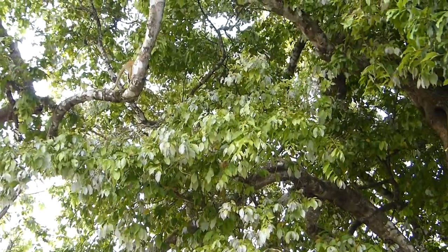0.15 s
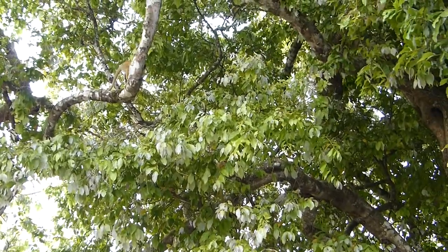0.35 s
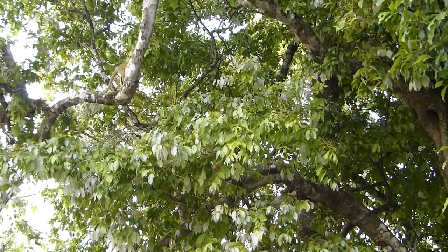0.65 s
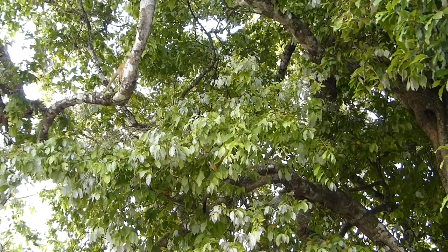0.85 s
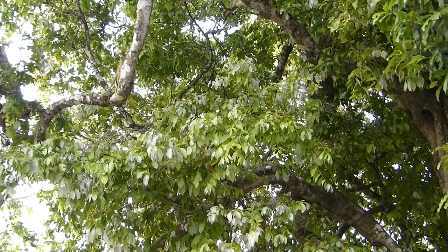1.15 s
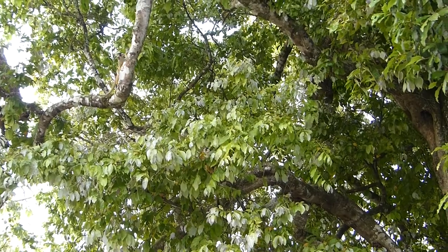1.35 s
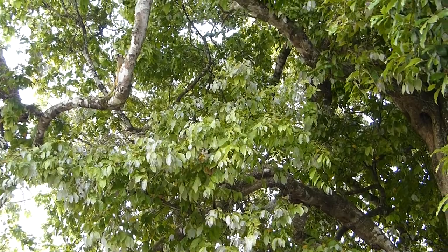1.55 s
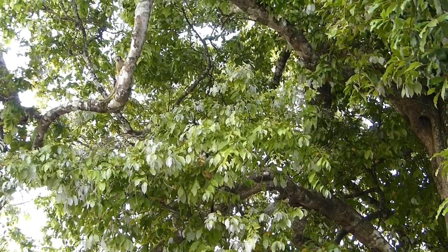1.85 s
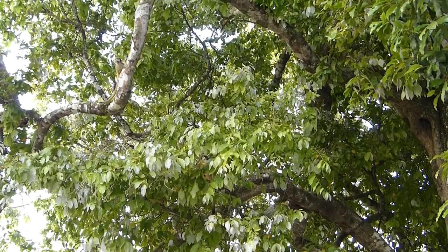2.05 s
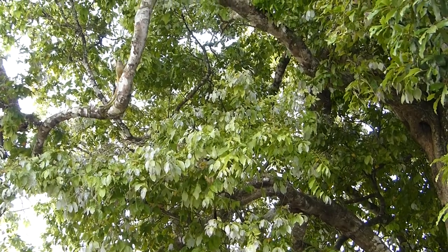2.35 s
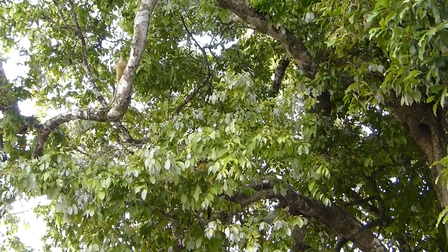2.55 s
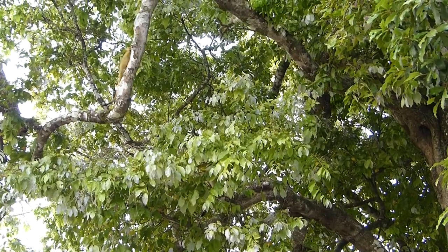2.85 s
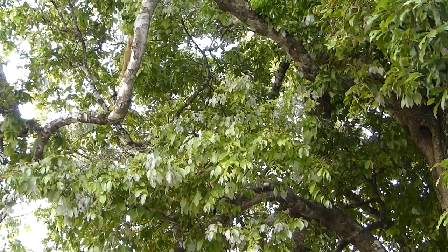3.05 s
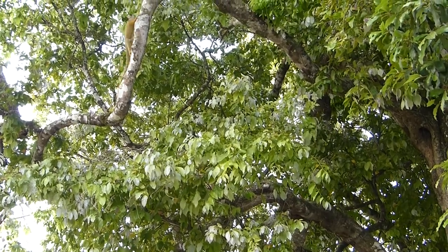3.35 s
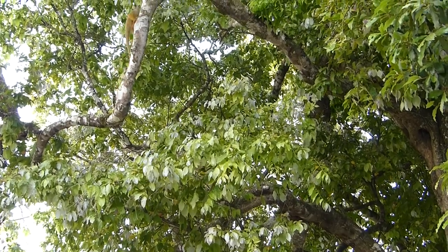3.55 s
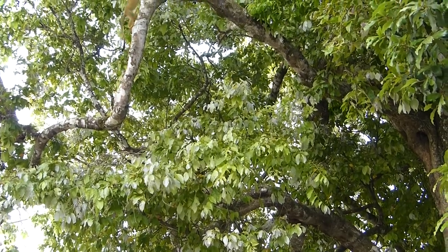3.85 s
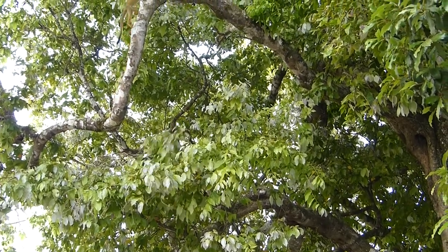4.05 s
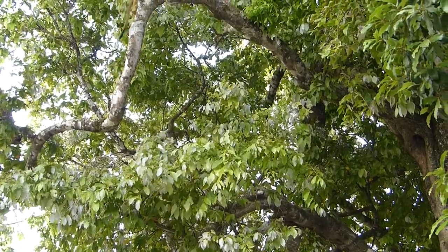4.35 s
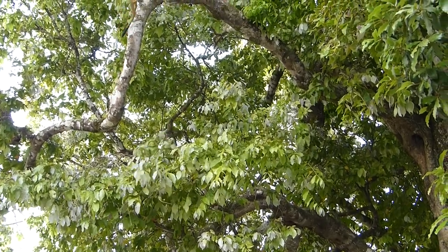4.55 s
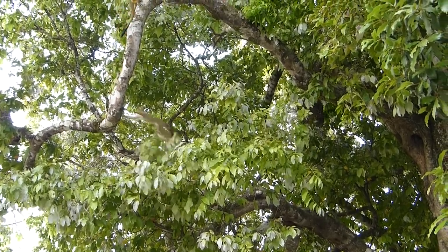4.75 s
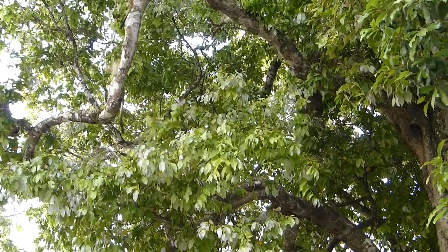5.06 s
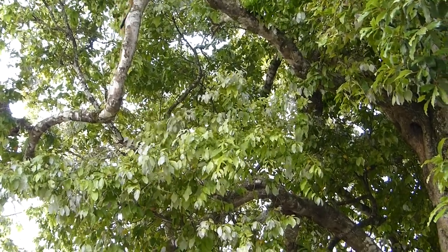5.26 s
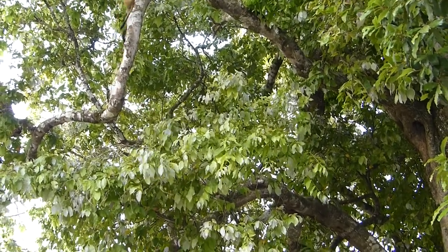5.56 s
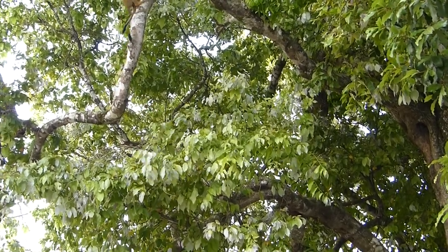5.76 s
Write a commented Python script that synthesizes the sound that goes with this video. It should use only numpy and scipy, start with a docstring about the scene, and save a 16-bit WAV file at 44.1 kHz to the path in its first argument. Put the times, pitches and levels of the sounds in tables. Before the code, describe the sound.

Outdoors under a big leafy tree, a soft insect whine and hissing chorus open the scene. Squirrel monkeys then give short, very high peeps that flick upward, spaced apart at first. After four seconds come longer arched calls, a quick cluster of steep chirps and hoarse notes, and a leafy burst with a dull bough thump. Stereo microphone at some distance, calls leaving short tails in the canopy.

```python
"""An insect whines over a hissing chorus and quiet outdoor air while leaves rustle faintly; then squirrel monkeys
call from a big tree. Thin gliding whistles flick upward at the end, and arched calls, steep chirps and hoarse notes
follow; limbs and leaves scatter each call into a short tail. Foliage is shaped noise that rises and dies with each
shake, a leaping animal's landings are bursts of low noise, and far callers and insects are narrow bands of noise."""
import sys
import numpy as np
from scipy import signal
from scipy.fft import rfft, irfft, next_fast_len
from scipy.io import wavfile

SR = 44100
rng = np.random.default_rng(int(sys.argv[2]) if len(sys.argv) > 2 else 0)


def dump(signal):
    """Clip the signal to [-1, 1] and save it as 16-bit WAV at the path in sys.argv[1]."""
    limited = np.clip(np.atleast_2d(signal).T, -1, 1)
    pcm = np.round(limited * 32767).astype(np.int16)
    wavfile.write(sys.argv[1], SR, pcm)


N = 259749  # samples
CUTOFF_HZ = 15900

SLIDE_SHARE = 0.32  # part of a peep's rise outside the final flick
FLICK_HZ_PER_S = 390000  # over the rise in Hz, this is the flick's growth rate: a wider rise takes longer
# Peeps and chirps, levels before the voice trim:
# start_s, length_s, start_hz, top_hz, level_db, crescendo_db, direct_path_db
PEEPS = [ (.52, 0.054, 7860, 10780, -35.5, 9.5, 2), (.906, .023, 7690, 10220, -31.5, -5.5, -1.5),
         (1.236, 0.06, 8360, 11500, -27.5, 9.5, 5), (1.494, 0.074, 8320, 11360, -27.5, 3, 4.5),
         (1.75, 0.076, 8210, 11320, -26, 3, 3.5), (2.557, 0.054, 8540, 11000, -27, 8, 4.5),
         (2.81, 0.06, 8070, 10700, -28.5, 2, 3), (3.296, 0.068, 8660, 10770, -27, -3.5, -10),
         (3.537, 0.088, 8265, 10620, -27, 2, 3), (4.129, 0.012, 8830, 11670, -21, 8, 1),
         (4.595, .048, 7030, 13000, -24, 4.5, -0.5), (4.8, .044, 6980, 13600, -22, 3.5, 2.5),
         (4.967, 0.074, 6560, 12760, -20, -4.5, -5.5), (5.174, 0.077, 5540, 13300, -24, 16, 6),
         (5.384, 0.075, 5144, 12080, -25, 7, 2.5), (5.43, 0.11, 8770, 11880, -27.5, 12.5, -16)]


def peeps(swell_db=3.5, pan_db=0.37, bright_db=6.5):
    """The pitch slides up, then shoots up just before the call stops; leaves in the way weaken the direct path."""
    out = np.zeros((2, N))
    for start, length, start_hz, top_hz, call_db, crescendo_db, direct_db in PEEPS:
        t = np.arange(int(length * SR)) / SR
        rise_hz = top_hz - start_hz
        progress = t / length
        flick = np.exp((t - length) * FLICK_HZ_PER_S / rise_hz)
        pitch_hz = start_hz + rise_hz * progress * (SLIDE_SHARE + (1 - SLIDE_SHARE) * flick)
        # the voice swells where the flick sets in
        swell = np.sin(np.pi * flick) - 0.5
        level_db = call_db + crescendo_db * (progress - 0.5) + swell_db * swell
        call = whistle(pitch_hz, level_db, overtone_at(call_db) + bright_db)
        add(out, start, canopy(call, direct_db))
    return out * from_db([[pan_db], [-pan_db]])


# Plain upward glides, most of them leading into a peep, levels before the voice trim:
# start_s, length_s, start_hz, end_hz, level_db, direct_path_db
GLIDES = [ (1.202, .03, 6300, 7960, -50.5, -19), (1.702, 0.0288, 4400, 5240, -47.5, 0.5),
          (2.531, .035, 5600, 7030, -49, -6), (3.287, .026, 5800, 6970, -47, -5),
          (3.509, 0.036, 6010, 8390, -27.5, -1.5), (3.835, 0.021, 7500, 8740, -40, 0.5),
          (3.999, 0.11, 8460, 9420, -27.5, 2)]


def glides(effort_db=6.0, bright_db=4.0, ease=0.731, soft_db=-7.5, swell_s=0.0045):
    """The pitch rises and eases off; the voice swells out of a soft start."""
    out = np.zeros((2, N))
    for start, length, start_hz, end_hz, call_db, direct_db in GLIDES:
        t = np.arange(int(length * SR)) / SR
        progress = t / length
        pitch_hz = start_hz + (end_hz - start_hz) * progress * (1 + ease * (1 - progress))
        level_db = call_db + soft_db * np.exp(-t / swell_s)
        call = whistle(pitch_hz, level_db, overtone_at(call_db + effort_db) + bright_db)
        add(out, start, canopy(call, direct_db))
    return out


ARCH_RISE_S, ARCH_FLICK_S = 0.028, 0.028  # climb to the crest (time constant), closing flick
ARCH_SWELL_S = 0.01  # time constant of the swell out of a soft start
ARCH_PUSH_AFTER_S, ARCH_PUSH_S = 0.014, 0.005  # the push comes this long into the fall, and takes this long
ARCH_FLICK_DB = -4  # the voice thins out in the flick
# Arched calls, levels before the voice trim:
# start_s, length_s, crest_s, fall_s, start_hz, crest_hz, dip_hz, top_hz,
# level_db, soft_start_db, push_in_fall_db, overtone_db (before the throat)
ARCHES = [ (4.249, 0.26, .1, 0.12, 7870, 9340, 5968, 8970, -23.5, -7, 2.5, -4),
          (4.66, 0.098, 0, .039, 4975, 4970, 4515, 8970, -27, 0.5, 3, -1),
          (5.656, .22, .13, .063, 8080, 9430, 7010, 10300, -22, -19.5, 4, 5)]


def arches(roughness=0.0042, direct_db=-1.5, flick_bend=1.0):
    """Calls move to a crest, swing down through a dip while growing louder, and end in an upward flick."""
    out = np.zeros((2, N))
    for (start, length, crest_s, fall_s, start_hz, crest_hz, dip_hz, top_hz,
         call_db, soft_db, push_db, overtone_db) in ARCHES:
        t = np.arange(int(length * SR)) / SR
        falling_s = np.maximum(t - crest_s, 0)
        push = np.clip((falling_s - ARCH_PUSH_AFTER_S) / ARCH_PUSH_S, 0, 1)
        flick = np.maximum(1 - (length - t) / ARCH_FLICK_S, 0) ** flick_bend
        pitch_hz = crest_hz + (start_hz - crest_hz) * np.exp(-t / ARCH_RISE_S)
        pitch_hz += (dip_hz - crest_hz) * np.sin(np.pi / 2 * falling_s / fall_s) ** 2
        pitch_hz += (top_hz - pitch_hz) * flick
        level_db = call_db + soft_db * np.exp(-t / ARCH_SWELL_S) + push_db * push + ARCH_FLICK_DB * flick
        call = whistle(pitch_hz, level_db, overtone_db, waver=roughness)
        add(out, start, canopy(call, direct_db))
    return out


# Low, hoarse notes among the chirps, levels before the voice trim:
# start_s, length_s, pitch_hz, level_db, overtone_db (before the throat), roughness (share of the pitch)
RASPS = [(4.956, 0.029, 2455, -40, 8.5, 0.023), (5.004, 0.043, 4837, -20.5, -9, 0.059),
         (5.212, 0.0335, 5130, -27.5, 0, 0.026)]


def rasps(direct_db=-5.0):
    """Hoarse notes hold one unsteady pitch."""
    out = np.zeros((2, N))
    for start, length, hz, level_db, overtone_db, roughness in RASPS:
        pitch_hz = np.full(int(length * SR), hz)
        call = whistle(pitch_hz, level_db, overtone_db, waver=roughness)
        add(out, start, canopy(call, direct_db))
    return out


ATTACK_S = 0.004
# How a small throat and mouth pass the whistle: frequency_hz, gain_db
THROAT = [(2300, 0), (4500, 1), (9000, 0.5), (10500, -5), (12000, -13), (13500, -21.5), (15500, -42)]


def whistle(pitch_hz, level_db, overtone_db, release_s=0.0017, waver=0.0021, third_db=-13):
    """A slightly unsteady tone with two overtones, shaped by the throat."""
    size = len(pitch_hz)
    t = np.arange(size) / SR
    pitch_hz = pitch_hz * (1 + waver * drift(717, size))
    phase = 2 * np.pi * np.cumsum(pitch_hz) / SR
    tone = np.zeros(size)
    for k, partial_db in enumerate((0, overtone_db, overtone_db + third_db), 1):
        # partials fade out over 1 kHz above the cutoff
        audible = np.clip((CUTOFF_HZ + 1000 - k * pitch_hz) / 1000, 0, 1)
        throat_db = at_hz(THROAT, k * pitch_hz)
        tone += audible * from_db(partial_db + throat_db) * np.sin(k * phase)
    gate = np.clip(np.minimum(t / ATTACK_S, (t[-1] - t) / release_s), 0, 1)
    return np.sqrt(2) * tone * from_db(level_db) * np.sin(np.pi / 2 * gate) ** 2


def overtone_at(level_db, full_voice_db=-25, fade_db_per_db=7):
    """The harder a monkey calls, the stronger its overtones, up to full voice."""
    return fade_db_per_db * min(level_db - full_voice_db, 0)


def canopy(call, direct_db, near_db=-2.5, near_t60=0.27, far_db=-4.0, far_t60=0.45, near_alike=0.75,
           far_alike=0.69, build_s=0.0062, limb_s=0.033, limb_echo_db=-15):
    """The direct call, echoes off limbs, a quick spray off nearby leaves, and a wider tail from the whole crown."""
    t = np.arange(SR * 3 // 4) / SR
    response = np.zeros((2, len(t)))
    for level_db, t60, alike in ((near_db, near_t60, near_alike), (far_db, far_t60, far_alike)):
        fade = 10 ** (-3 * t / t60)  # 60 dB down after t60 seconds
        density = fade * (1 - np.exp(-(t / build_s) ** 2))
        response += from_db(level_db) * stereo_noise(alike, len(t)) * density / np.linalg.norm(density)
    # late copies of a gliding tone beat against it and make it flutter
    delays_s = 2 * build_s + limb_s * rng.random(size=3)
    response[:, (delays_s * SR).astype(int)] += from_db(limb_echo_db)
    response[:, 0] += from_db(direct_db)
    return signal.fftconvolve(call[None], response, axes=1)


# Stirring of the leaves as the troop moves: faint, then growing, with a brief surge near 5 s before it fades.
# Levels before the stir and leaf trims: time_s, level_db
STIR = [(0.0, -69), (0.69, -71), (3.64, -62), (4.86, -59), (4.99, -48.5), (5.15, -61), (5.68, -65.5),
        (5.89, -69.5)]
# A branch is brushed or shaken, before the leaf and twig trims: start_s, leaf_db, twig_db, decay_s
RUSTLES = [ (.09, -65, -65, .05), (.31, -68, -56, 0.15), (1.28, -64, -56, .08), (1.6, -65, -52.5, 0.09),
           (1.92, -60, -55.5, 0.092), (2.44, -64.5, -53, 0.17), (2.89, -55, -46.5, 0.042),
           (3.42, -63.5, -55, 0.14), (3.75, -70, -50, 0.035), (3.99, -68, -53, 0.15),
           (4.24, -58.5, -53.5, 0.3), (4.785, -50.5, -48, 0.13), (4.86, -46.5, -49.5, 0.097),
           (4.976, -36.5, -54, 0.074), (5.031, -52.5, -39.5, 0.093), (5.32, -64, -50.5, 0.15)]
# Colour of brushed leaves: frequency_hz, relative_level_db (per Hz)
LEAVES = [(300, -23), (1000, -11.5), (1800, -2.5), (3000, 5.5), (5000, 8), (9000, 7.5), (13000, -12.5),
          (16000, -58)]
# Dull colour of swaying twigs and of the outdoor air: frequency_hz, relative_level_db (per Hz)
AIR = [(15, -55), (25, -24), (69, -16.5), (234, -5.5), (409, -3.5), (468, 3), (525, -2.5), (649, 3),
       (743, 4.5), (802, -2), (1090, -6.5), (1200, -5), (1460, -7.5), (2500, -16), (3250, -24.5),
       (5500, -120)]


def foliage(leaf_db=7.0, twig_db=1.5, crackle_db=1.0, snaps_per_s=450, snap_db=-10.5, stir_db=-2, sway_db=-60):
    """Leaves brush in small uneven bursts and tick against each other, over the duller sway of twigs."""
    leaf_power = from_db(in_time(STIR)[0] + stir_db) ** 2
    twig_power = from_db(sway_db) ** 2  # twigs sway all the time
    for start, leaves_db, twigs_db, decay_s in RUSTLES:
        motion = shake(start, 0.012, decay_s)
        leaf_power = leaf_power + (from_db(leaves_db) * motion) ** 2
        twig_power = twig_power + (from_db(twigs_db) * motion) ** 2
    brushing = rms_one(broad(LEAVES) * from_db(crackle_db * drift(300, N)))
    snaps = (rng.random(N) < snaps_per_s / SR) * rng.standard_normal(N)
    tick_band = signal.butter(2, [1200, 5000], "band", fs=SR, output="sos")
    ticking = rms_one(signal.sosfilt(tick_band, snaps + 1e-18))
    leaves = (brushing + from_db(snap_db) * ticking) * from_db(leaf_db) * np.sqrt(leaf_power)
    twigs = broad(AIR) * from_db(twig_db) * np.sqrt(twig_power)
    return leaves + twigs


# An animal's weight on a limb: start_s, level_db, decay_s
LANDINGS = [(4.785, -52, 0.05), (5.027, -30, 0.061), (5.32, -60, 0.11)]
# Colour of a thrashing bough: frequency_hz, relative_level_db (per Hz)
BOUGH = [(53, -52), (90, -52), (274, -23), (431, -9.5), (544, -12), (707, -3.5), (868, -17.5),
         (1370, -12.5), (2400, -53), (3120, -49), (5280, -120)]


def landings(give_s=0.014):
    """A bough gives under a leaping animal and thrashes to rest."""
    swing = sum(from_db(level_db) * shake(start, give_s, decay_s) for start, level_db, decay_s in LANDINGS)
    return swing * broad(BOUGH)


def shake(start, attack_s, decay_s):
    """Motion of a disturbed branch: it builds quickly and dies away."""
    t = np.maximum(np.arange(N) / SR - start, 0)
    return (1 - np.exp(-t / attack_s)) * np.exp(-t / decay_s)


# Far-off callers, blurred by distance: start_s, length_s, pitch_hz, blur_hz, level_db
FAR_CALLS = [(3.75, 0.17, 1260, 170, -57), (4.194, 0.19, 1280, 170, -53.5), (4.38, 0.084, 1265, 164, -49),
             (4.678, 0.31, 1284, 169.2, -49), (5.118, 0.23, 1744, 75, -58.5), (5.437, 0.26, 1760, 76, -59),
             (5.663, .3, 1786, 75, -60.5)]


def far_calls():
    """Faint notes from far away, smeared into narrow bands, swell and fade."""
    out = np.zeros((2, N))
    for start, length, hz, blur_hz, level_db in FAR_CALLS:
        progress = np.clip((np.arange(N) / SR - start) / length, 0, 1)
        out += from_db(level_db) * np.sin(np.pi * progress) * narrow(hz, blur_hz)
    return out


# Bouts of the nearest insect: start_s, end_s, rise_s, fall_s, level_db
INSECT_BOUTS = [(0, 1.03, .3, .12, -58.5), (0.992, 2.35, 0.115, .5, -59), (3.904, 6.2, 0.37, .3, -59)]


def near_insect(width=190, sung_hz=5277, wind_up_hz_per_s=620, idle_db=-68.5):
    """One insect idles between bouts; each bout winds up in pitch and level, holds and fades."""
    t = np.arange(N) / SR
    gain, hz = from_db(idle_db), sung_hz
    for start, end, rise_s, fall_s, level_db in INSECT_BOUTS:
        bout = np.clip(np.minimum((t - start) / rise_s, (end - t) / fall_s), 0, 1)
        gain = np.maximum(gain, from_db(level_db) * bout)
        hz = hz - wind_up_hz_per_s * np.maximum(start + rise_s - t, 0) * (t >= start)
    return gain * blurred_tone(hz, width)


# Bands of the insect chorus, before its swell: centre_hz, width_hz, level_db
INSECT_BANDS = [(4960, 390, -58), (6070, 500, -56), (8340, 2000, -57.5)]
# Swell of the chorus: time_s, gain_db
CHORUS_SWELL = [(0, -6), (.35, -7.5), (1.9, -10), (2.3, -9), (3.9, -14), (4.3, -4.5), (5.89, -5.5)]


def insects():
    """One insect sings over a distant chorus that hisses in a few narrow bands."""
    swell_db, = in_time(CHORUS_SWELL)
    chorus = sum(from_db(level_db) * narrow(hz, width) for hz, width, level_db in INSECT_BANDS)
    return from_db(swell_db) * chorus + near_insect()


def outdoor_air(level_db=-56):
    """The quiet outdoor floor, a steady diffuse noise."""
    return from_db(level_db) * broad(AIR)


# Colour of the microphone hiss: frequency_hz, relative_level_db (per Hz)
HISS = [(20, 7.5), (60, -4), (300, -15), (14000, -8), (15500, -14)]


def microphone_hiss(level_db=-74):
    """Steady noise of the microphone."""
    return from_db(level_db) * broad(HISS)


# Left-right likeness of the surroundings: frequency_hz, correlation (-1 to 1)
LIKENESS = [(30, 1), (80, 0.8), (170, -0.063), (350, -0.53), (700, -0.64), (1050, 0.16), (1400, 0.15),
            (2100, 0.39), (3500, 0.66), (12000, 0.69)]


def surround(colour_db):
    """Diffuse stereo noise of rms 1, coloured by a function of frequency."""
    size = next_fast_len(N, real=True)
    hz = np.arange(size // 2 + 1) * SR / size
    mid, side = rfft(rng.standard_normal((2, size))) * from_db(colour_db(hz))
    alike = np.clip(at_hz(LIKENESS, hz), -1, 1)
    stereo = np.sqrt(1 + alike) * mid + np.sqrt(1 - alike) * side * [[1], [-1]]
    return rms_one(irfft(stereo, size)[:, :N])


def broad(spectrum):
    """Diffuse noise with a given spectrum."""
    return surround(lambda hz: at_hz(spectrum, hz))


def narrow(centre_hz, width):
    """Diffuse noise in one narrow resonance."""
    return surround(lambda hz: -20 * np.log10(1 + ((hz - centre_hz) / width * 2) ** 2))


def blurred_tone(hz, width):
    """A narrow band of sound whose centre follows a pitch."""
    glide = np.exp(2j * np.pi * np.cumsum(hz - hz.mean()) / SR)
    return np.real(signal.hilbert(narrow(hz.mean(), width)) * glide)


def stereo_noise(alike, size):
    """Two white noises with the given correlation."""
    mid, side = rng.standard_normal((2, size))
    alike = np.clip(alike, -1, 1)
    return np.sqrt((1 + alike) / 2) * mid + np.sqrt((1 - alike) / 2) * side * [[1], [-1]]


def drift(rate, size):
    """Random wandering: rate normal draws a second, joined by straight lines."""
    steps = np.arange(size) * rate / SR
    return np.interp(steps, np.arange(size), rng.standard_normal(size))


def from_db(db):
    """Decibels to gain."""
    return 10 ** (np.asarray(db) / 20)


def rms_one(x):
    """Scale to unit rms."""
    return x / np.sqrt(np.mean(x ** 2) + 1e-20)


def in_time(rows):
    """Each column of a curve at every sample."""
    s, *columns = np.transpose(rows)
    return [np.interp(np.arange(N) / SR, s, c) for c in columns]


def at_hz(points, hz):
    """Read a spectrum on a log-frequency axis."""
    point_hz, value = np.array(points).T
    return np.interp(np.log(hz + 1e-9), np.log(point_hz), value)


def add(out, start_s, sound):
    """Mix a stereo sound in at a given time."""
    i = int(np.clip(round(start_s * SR), 0, N))
    out[:, i:i + sound.shape[1]] += sound[:, :N - i]


def scene(voice_db=-2.0):
    """Monkeys in the tree over the outdoor floor."""
    monkeys = from_db(voice_db) * (peeps() + glides() + arches() + rasps())
    tree = foliage() + landings()
    background = far_calls() + insects() + outdoor_air() + microphone_hiss()
    return monkeys + tree + background


def record(dry):
    """A steep low-pass cuts the top."""
    low_pass = signal.ellip(10, 0.1, 80, CUTOFF_HZ, fs=SR, output="sos")
    return signal.sosfilt(low_pass, dry)


dry = scene()
out = record(dry)
dump(out)
```